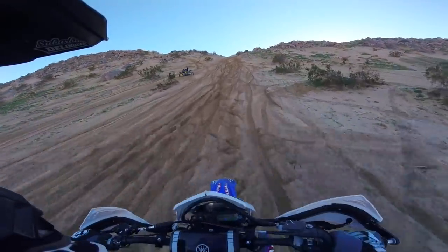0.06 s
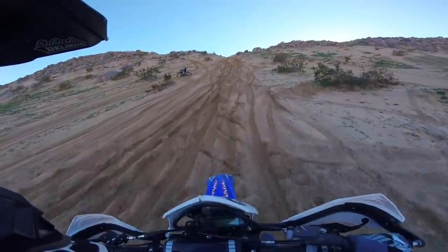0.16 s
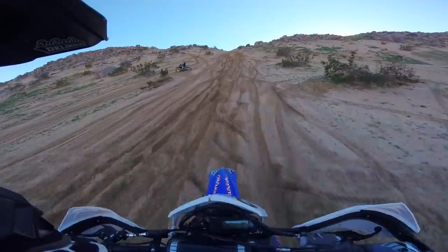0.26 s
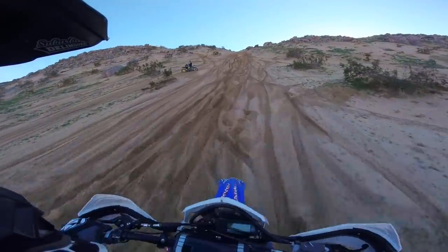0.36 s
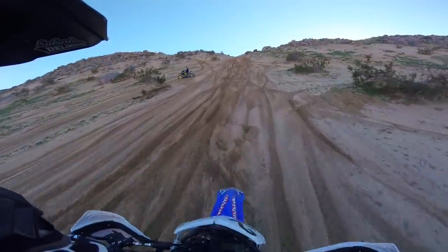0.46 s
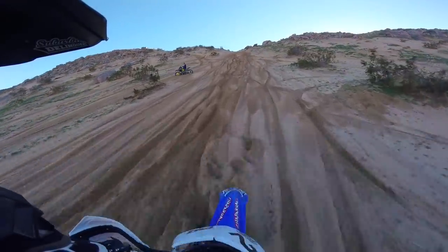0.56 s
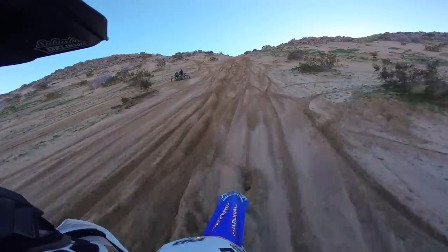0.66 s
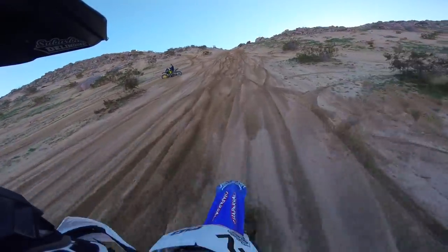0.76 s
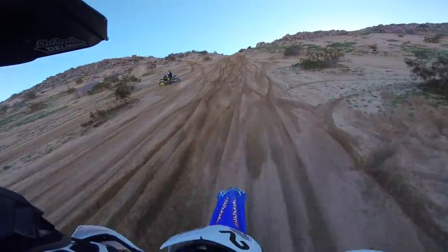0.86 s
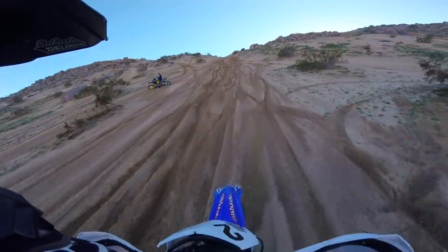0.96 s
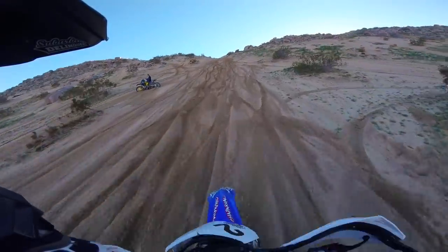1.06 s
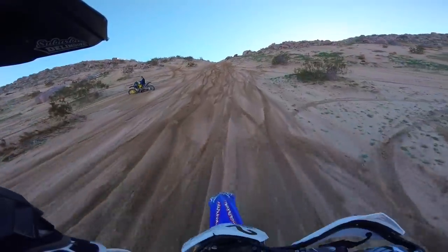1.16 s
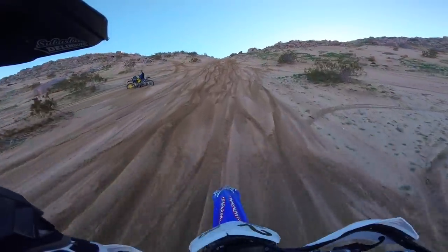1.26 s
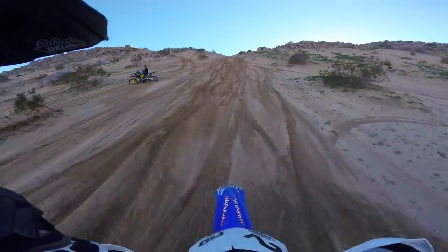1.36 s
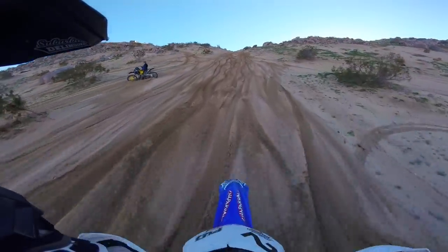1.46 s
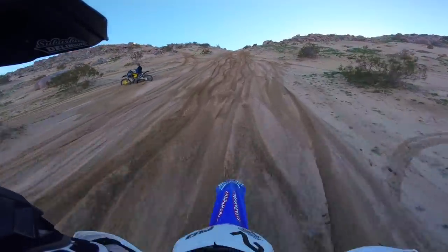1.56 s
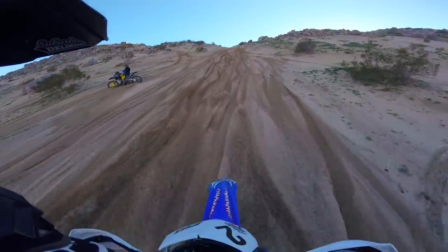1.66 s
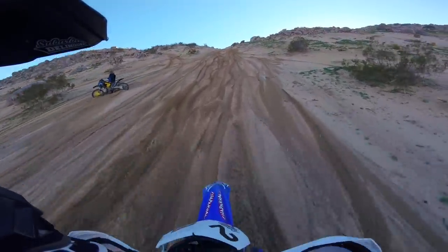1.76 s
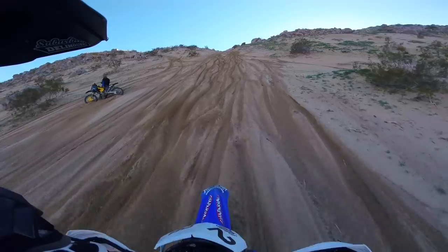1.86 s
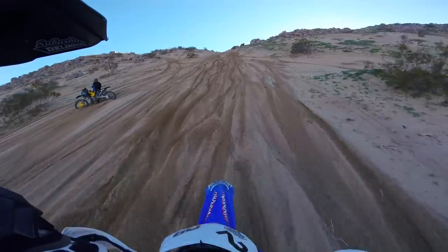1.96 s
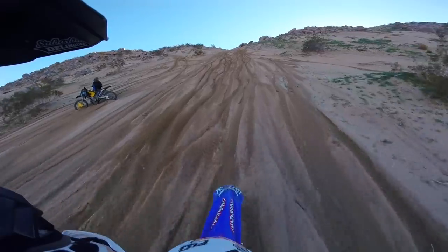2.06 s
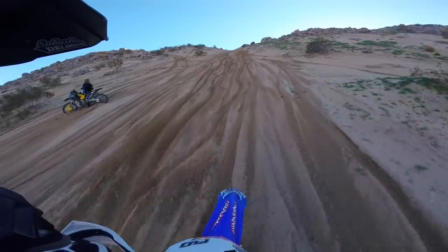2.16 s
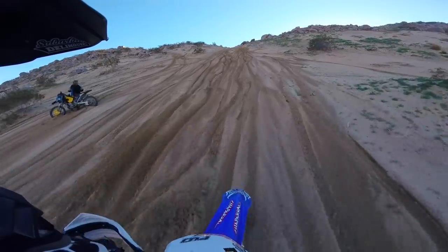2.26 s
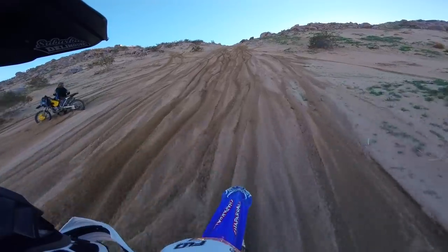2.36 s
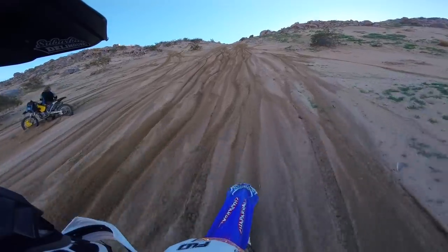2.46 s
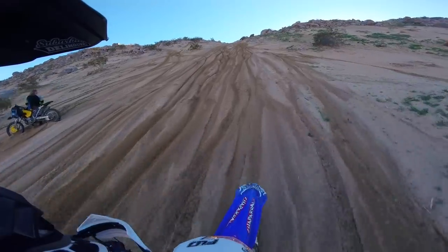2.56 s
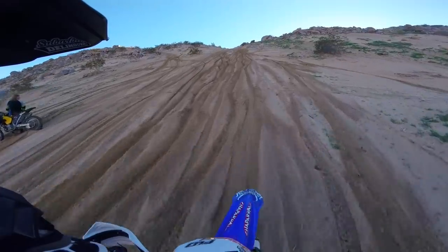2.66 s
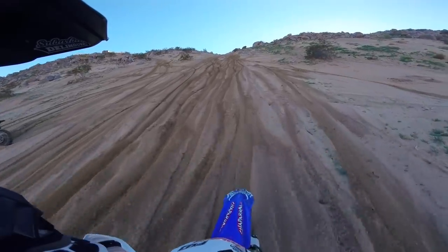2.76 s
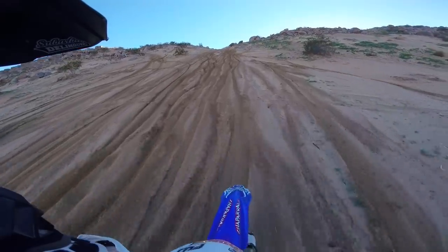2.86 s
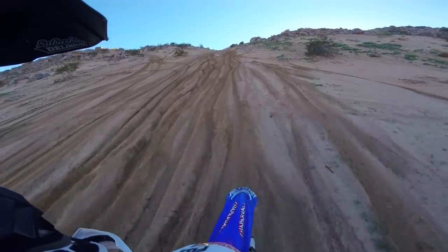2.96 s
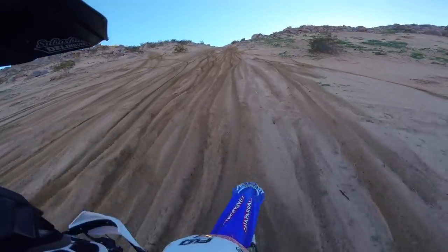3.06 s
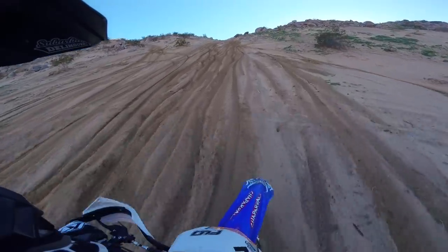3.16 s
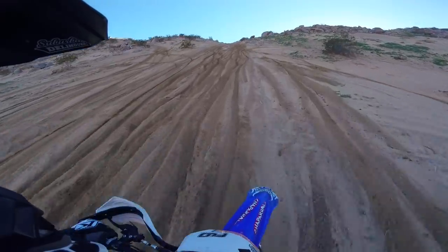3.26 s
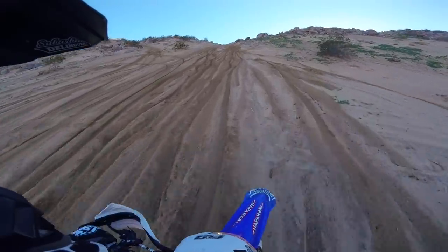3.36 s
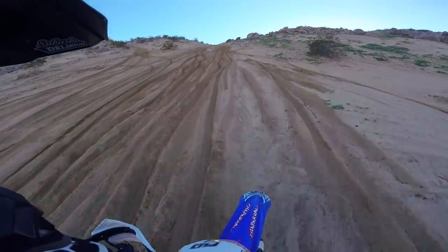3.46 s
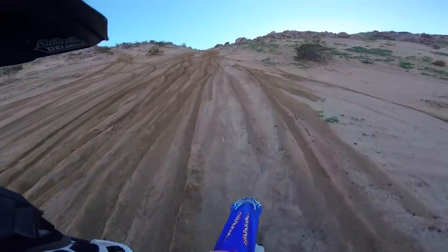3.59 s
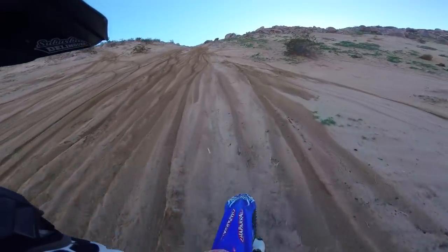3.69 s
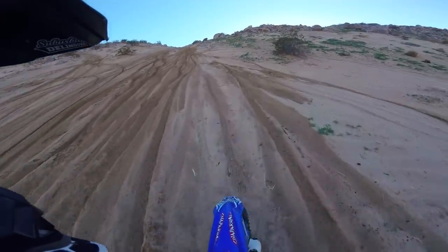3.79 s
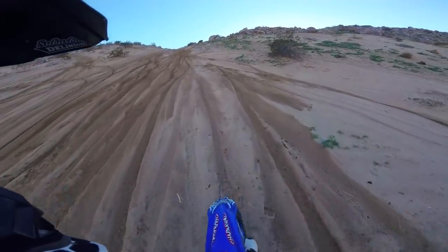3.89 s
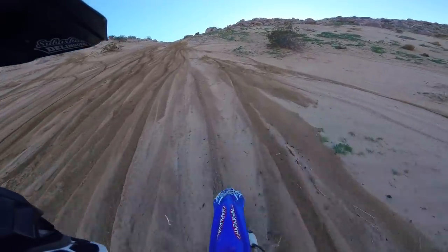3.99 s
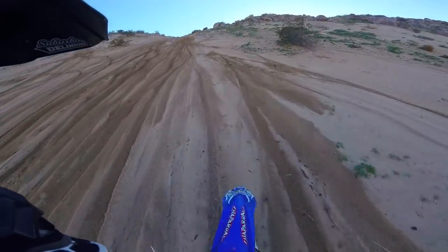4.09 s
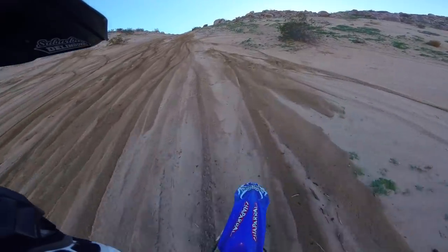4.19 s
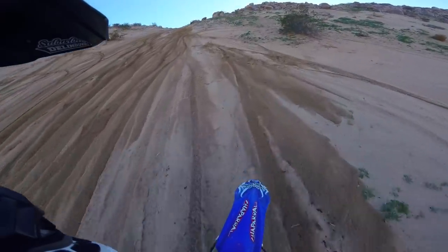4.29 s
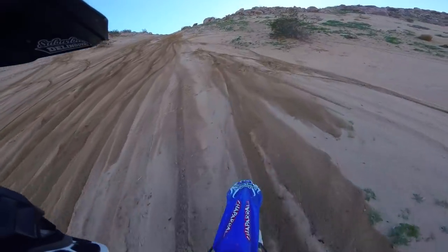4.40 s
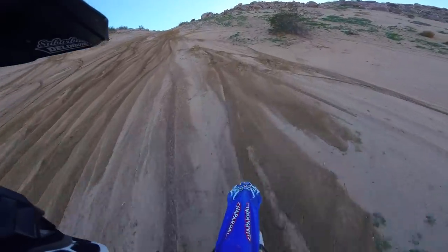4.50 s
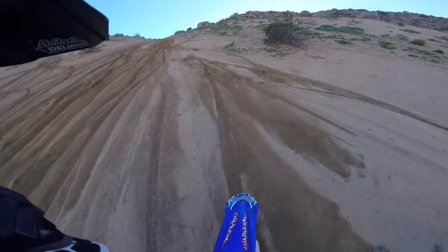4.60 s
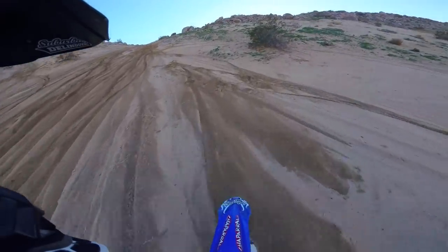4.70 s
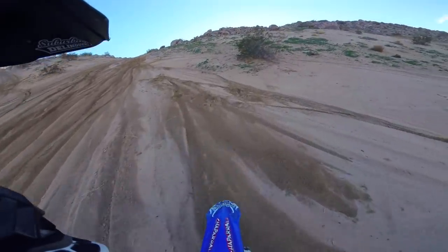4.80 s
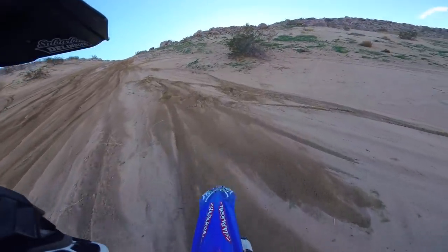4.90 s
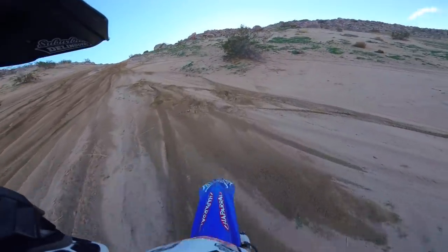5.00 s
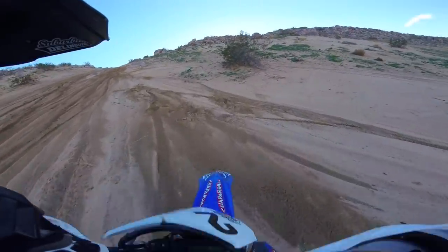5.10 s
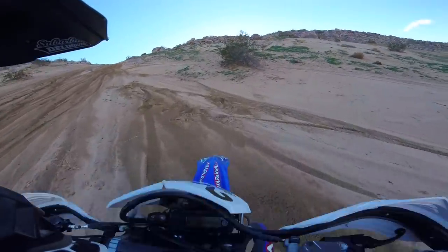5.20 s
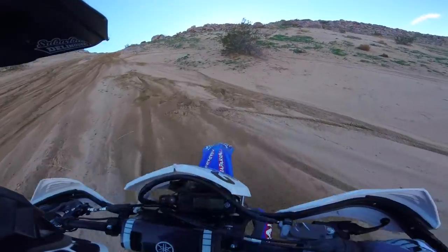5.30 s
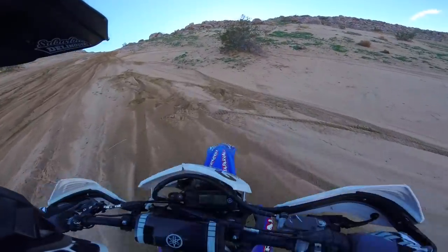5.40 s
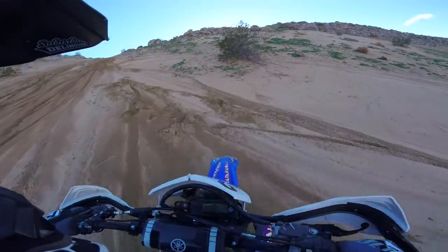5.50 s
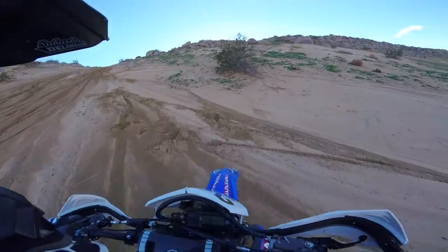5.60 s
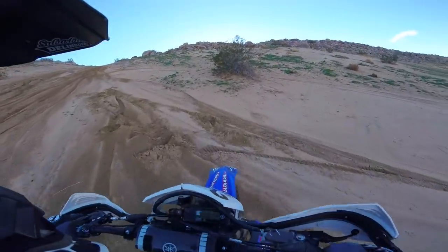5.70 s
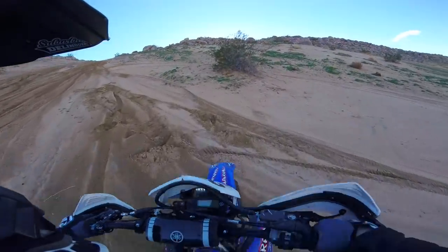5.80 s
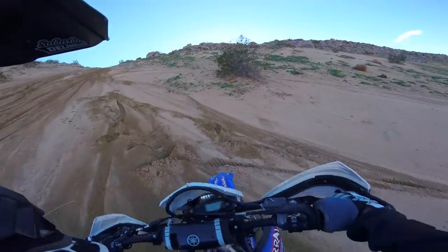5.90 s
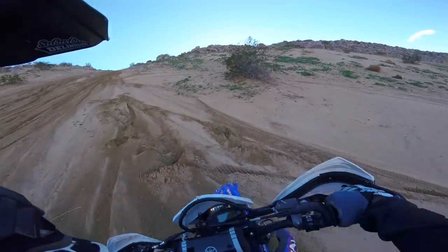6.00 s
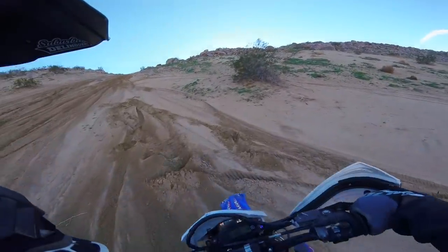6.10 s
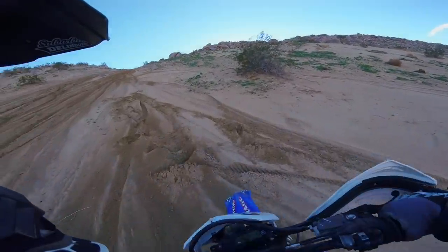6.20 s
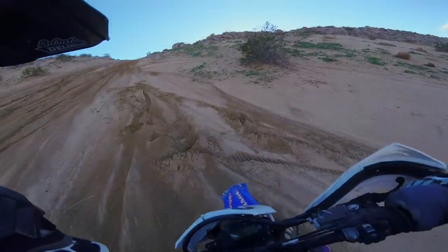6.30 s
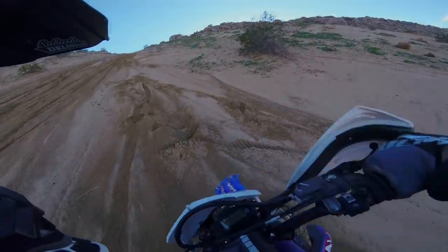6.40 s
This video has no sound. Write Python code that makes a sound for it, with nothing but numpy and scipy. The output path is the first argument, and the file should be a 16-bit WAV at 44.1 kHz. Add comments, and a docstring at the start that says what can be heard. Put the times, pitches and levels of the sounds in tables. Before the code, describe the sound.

From a microphone on the rider's helmet, a single-cylinder four-stroke dirt bike pulls hard up an open sandy hill. The revs flare briefly, settle into a steady booming growl with a raspy exhaust edge, then slowly sag. Near the end the throttle snaps shut, and the engine falls into soft, dull pops with a brief gear rattle. Low wind buffets throughout.

```python
"""A single-cylinder four-stroke dirt bike climbs a sandy hill at full throttle, heard from the rider's helmet.
The revs flare up, then sag as the hill steepens: boom, growl and rasp all follow the cycle's pressure pulses.
Early on a spray of sand bursts over the thin ticking of noise-like grit on the plastics.
Near the top the throttle shuts: the engine putters down in soft sucks and pops, and slack gears knock briefly.
Turbulent gas noise breathes with the valves, and low wind noise buffets the microphone throughout."""
import sys
import numpy as np
from scipy import signal
from scipy.fft import rfft, irfft, next_fast_len
from scipy.io import wavfile
from scipy.ndimage import uniform_filter1d

SR = 44100
rng = np.random.default_rng(int(sys.argv[2]) if len(sys.argv) > 2 else 0)


def pcm_store(signal):
    """Save signal as 16-bit PCM."""
    levels = np.round(np.clip(np.atleast_2d(signal), -1, 1) * 32767)
    wavfile.write(sys.argv[1], SR, levels.astype(np.int16).T)


N = 284445
TIME = np.arange(N) / SR
# firing rate with the throttle shut: the revs fall towards it
IDLE_HZ = 23.44


def from_db(db):
    """Decibels to gain."""
    return 10 ** (np.asarray(db) / 20)


def rms_one(x):
    """Scale to rms 1."""
    return x / np.sqrt(np.mean(x ** 2) + 1e-20)


def evened(x, size=3500):
    """Hold the running rms near 1; size is the smoothing length in samples."""
    power = uniform_filter1d(uniform_filter1d(x ** 2, size), size)
    return x / np.sqrt(np.maximum(power, 1e-12))


def in_time(rows):
    """Each column of a curve over time, sample by sample."""
    s, *columns = np.transpose(rows)
    return [np.interp(TIME, s, column) for column in columns]


def at_revs(rows, firing_hz):
    """Each column of a table over engine speed, sample by sample."""
    hz, *columns = np.transpose(rows)
    return [np.interp(firing_hz, hz, column) for column in columns]


def at_hz(points, hz):
    """Gain of a spectrum at the given frequencies, interpolated over log frequency."""
    freqs, levels = np.transpose(points)
    return from_db(np.interp(np.log(np.maximum(hz, 1)), np.log(freqs), levels))


def ramp(start_s, length_s):
    """Rise from 0 to 1."""
    return np.clip((TIME - start_s) / length_s, 0, 1)


def drift(rate):
    """Smooth chance of spread 1 that changes about rate times a second."""
    step = 64
    r = np.exp(-2 * np.pi * rate * step / SR)
    chance = rng.standard_normal(N // step + 2002)
    # the first 2000 steps let the filter settle
    slow = signal.lfilter([1], [1, -2 * r, r * r], chance)[2000:]
    return np.interp(np.arange(N) / step, np.arange(len(slow)), rms_one(slow))


def coloured(x, spectrum):
    """Causal (minimum-phase) filter with the given spectrum."""
    size = 2 * next_fast_len(N // 2 + 4096)
    cepstrum = irfft(np.log(at_hz(spectrum, np.arange(size // 2 + 1) * SR / size)))
    # folding the cepstrum onto positive time makes the filter causal
    cepstrum[1:size // 2] *= 2
    cepstrum[size // 2 + 1:] = 0
    response = np.exp(rfft(cepstrum))
    return irfft(rfft(x, size) * response)[:N]


def noise(spectrum):
    """Coloured noise of rms 1."""
    return rms_one(coloured(rng.standard_normal(N), spectrum))


def resonance(x, hz, width_hz):
    """Two-pole resonance."""
    r = np.exp(-np.pi * width_hz / SR)
    return signal.lfilter([1, 0, -1], [1, -2 * r * np.cos(2 * np.pi * hz / SR), r * r], x + 1e-18)


def pulses(cycles, place, spread_db):
    """One click a cycle at the given place, each of its own strength."""
    turns = np.arange(int(cycles[-1]) + 1) + place % 1
    at = np.interp(turns[turns < cycles[-1]], cycles, np.arange(N))
    strength = from_db(spread_db * rng.standard_normal(1000)[:len(at)])
    out, whole = np.zeros(N + 1), at.astype(int)
    # share each click between two samples to place it exactly
    out[whole] += strength * (1 - at % 1)
    out[whole + 1] += strength * (at % 1)
    return out[:N]


def valve_open(cycles, place, sharpness):
    """A smooth gate that peaks once a cycle."""
    return np.exp(sharpness * (np.cos(2 * np.pi * (cycles - place)) - 1))


def engine_speed():
    """Firings per second: the revs under load, then a free coast towards idle."""
    # engine speed while pulling: t/s, firing rate/Hz
    revs = [(0.0, 75.21), (0.1, 76.61), (0.305, 85.25), (0.488, 88.56), (0.709, 89.86), (0.954, 82.25),
            (1.2, 81.7), (1.337, 79.92), (1.615, 81.59), (2.349, 79.78), (2.649, 77.69), (2.927, 79.15),
            (3.566, 76.44), (3.637, 77.39), (4.059, 78.28), (4.38, 77.44), (4.645, 74.74), (4.81, 71.1),
            (4.901, 73.13), (5.204, 69.37), (5.423, 69.6), (5.577, 66.52), (5.722, 59.79), (5.8, 51.56)]
    coast_s = .4901  # time constant
    pulling_hz, = in_time(revs)
    coasted_s = np.maximum(TIME - revs[-1][0], 0)
    return IDLE_HZ + (pulling_hz - IDLE_HZ) * np.exp(-coasted_s / coast_s)


def engine_order(cycles, firing_hz, order):
    """One complex harmonic of height 1, its phase set by the cycle's pulses; the valve thump gains most with revs."""
    # pressure pulses (intake, valve closing, exhaust):
    # place in cycle/0-1, level/dB, corner f/Hz, gain with firing rate/(dB per Hz)
    strokes = [(.65, -0.5, 835, 0.5), (.05, -3, 690, 1.13), (.42, -6.5, 1600, 1)]
    hz = order * np.mean(firing_hz)
    above_usual = firing_hz - np.median(firing_hz)
    total = 0
    for place, db, corner, slope in strokes:
        strength = from_db(db + slope * above_usual) / (1 + (hz / corner) ** 2)
        total = total + strength * np.exp(-2j * np.pi * order * place)
    return np.exp(1j * (2 * np.pi * order * cycles + np.angle(total)))


def boom(cycles, firing_hz, flutter_db=0.19, waver_db=0.5):
    """The airbox passes the lowest orders as clean, wavering tones; pulses weaken the fourth at one speed."""
    # level of the firing fundamental: t/s, level/dB
    fundamental = [(0.1, -24.5), (.6, -34), (1.0, -31), (1.65, -36), (3.6, -31), (4.3, -30.5), (4.8, -28.5),
                   (5.25, -35.5), (5.72, -31)]
    # airbox resonances that the next orders slide through: f/Hz, level/dB
    airbox_colour = [(138, -39), (162, -27.5), (190, -26), (210, -20.5), (242, -13), (270, -14.5),
                     (310, -16), (350, -15), (388, -15.5), (410, -19), (435, -22.5), (448, -28)]
    # feed of those orders: order, level/dB, waver/dB
    boom_feed = [(2, 8.5, 0.47), (3, 1, 0.27), (4, -3.5, 1), (5, 0.5, 0.54)]
    # the pulses cancel around this firing rate: rate, half-width, share left
    cancel_at_hz, cancel_width_hz, cancel_left = 79.36, 3.93, .2

    fundamental_db = in_time(fundamental)[0] + waver_db * drift(11)
    tones = from_db(fundamental_db) * engine_order(cycles, firing_hz, 1).real
    off = (firing_hz - cancel_at_hz) / cancel_width_hz
    for order, db, sway_db in boom_feed:
        order = round(order)
        gain = from_db(db + sway_db * drift(6)) * at_hz(airbox_colour, order * firing_hz)
        if order == 4:
            gain = gain * np.hypot(off, cancel_left) / np.hypot(off, 1)
        tones = tones + gain * engine_order(cycles, firing_hz, order).real
    # sqrt(2) turns tone heights into rms levels
    return np.sqrt(2) * tones * from_db(flutter_db * drift(22))


def growl(cycles, firing_hz, flutter_db=.5, swell_db=2.5, rough=0.21):
    """Middle orders slide through three duct bands; shifting reflections swell them, uneven burns roughen them."""
    # duct resonances: f/Hz, level/dB
    growl_colour = [(400, -6), (440, -3), (500, -16), (550, -10), (620, -7), (660, -13.5), (710, -8.5),
                    (790, -5), (890, -17.5), (990, -16), (1100, -18), (1250, -19.5), (1420, -20.5),
                    (1560, -27.5)]
    # how strongly the valve timing feeds each order: order, level/dB
    order_feed = [(6, -0.5), (7, -0.5), (8, -1.5), (9, 3), (10, 0.5), (11, -0.5), (13, 0.5), (16, -0.5),
                  (17, -1), (19, -3.5), (22, -8)]
    # duct bands before trim: t/s, lower level/dB, middle level/dB, upper level/dB
    duct_levels = [(0.0, -22, -24, -28), (0.16, -20.5, -20.5, -23.5), (0.25, -27, -17.5, -26.5),
                   (0.43, -23, -23.5, -24.5), (0.72, -22.5, -23, -25.5), (0.84, -27.5, -27, -23),
                   (1.05, -24, -19, -28), (1.51, -25, -22, -26.5), (3.09, -27, -20.5, -27.5),
                   (3.33, -23, -22, -28), (4.06, -28, -20, -27), (4.25, -25, -18.5, -26.5),
                   (4.59, -19.5, -19.5, -28.5), (4.72, -22, -22, -27.5), (4.84, -22, -22.5, -34),
                   (4.97, -19.5, -20.5, -28), (5.15, -21, -23, -30.5), (5.72, -19, -25.5, -29.5)]
    # trim of the lower, middle and upper band: level/dB
    duct_trims_db = [1.5, 0, -0.5]

    lower = middle = upper = 0
    for order in range(6, 23):
        # short waves are scattered most, which spreads them over the whole cycle
        scatter = min((order - 5) / 9, 1.3)
        paths = from_db(swell_db * drift(1.6))
        paths = paths * np.exp(1j * scatter * drift(.6))
        burns = 1 + rough * scatter * (drift(12) + 1j * drift(28))
        hz = order * firing_hz
        feed_db = np.interp(order, *np.transpose(order_feed))
        gain = from_db(feed_db) * at_hz(growl_colour, hz)
        tone = gain * (paths * burns * engine_order(cycles, firing_hz, order)).real
        # crossfade between ducts over 50 Hz
        past_lower = np.clip(.5 + (hz - 665) / 50, 0, 1)
        past_middle = np.clip(.5 + (hz - 920) / 50, 0, 1)
        lower = lower + (1 - past_lower) * tone
        middle = middle + (past_lower - past_middle) * tone
        upper = upper + past_middle * tone
    ducts = 0
    for db, trim_db, duct in zip(in_time(duct_levels), duct_trims_db, (lower, middle, upper)):
        ducts = ducts + from_db(db + trim_db) * evened(duct)
    return ducts * from_db(flutter_db * drift(17))


def rasp(cycles, intake_db=-3.5, thump_db=-7, ground_db=-5, trim_db=-2.0, surge_db=1.3):
    """The sharp exhaust front and its bounce off the ground, then weaker intake and valve-closing fronts."""
    # rasp of the sharp fronts: f/Hz, level/dB
    rasp_colour = [(700, -35), (1300, -17), (1540, -9.5), (1660, 2), (1900, 2), (2200, 0), (2450, -10),
                   (2800, -7), (3200, -21.5), (3900, -14.5), (4600, -21.5), (6000, -43.5)]
    exhaust = pulses(cycles, place=.42, spread_db=.8)
    # the other fronts wander in time
    bounce = pulses(cycles + .008 * drift(.8), place=.48, spread_db=.8)
    intake = pulses(cycles + .008 * drift(.8), place=.74, spread_db=1.1)
    thump = pulses(cycles + .008 * drift(.8), place=.03, spread_db=1.1)
    fronts = exhaust + from_db(ground_db) * bounce
    fronts = fronts + from_db(intake_db) * intake + from_db(thump_db) * thump
    return from_db(trim_db + surge_db * drift(8.3)) * evened(coloured(fronts, rasp_colour))


def panel(cycles, firing_hz, ring_hz=1690, width_hz=70):
    """Every firing shakes a panel with one narrow mode."""
    # the panel rings along once the revs sag: firing rate/Hz, level/dB
    panel_ring = [(69.8, -40), (72, -52.5), (76, -60.5)]
    kicks = pulses(cycles, place=.45, spread_db=1.8)
    shaken = resonance(kicks, ring_hz, width_hz)
    return from_db(at_revs(panel_ring, firing_hz)[0]) * evened(shaken)


def putter(cycles, firing_hz, loose=0.0095, uneven_db=1.6):
    """With the throttle shut each cycle is a soft suck and dull pops in the pipe, loosely timed."""
    # pulses of one cycle: place in cycle/0-1, relative pressure (negative sucks)
    shut_strokes = [(.6, 0.35), (.7, -0.64), (.83, 0.82), (0.94, 0.09), (.3, 0.19)]
    # dull pipe: f/Hz, level/dB
    putter_colour = [(30, -19), (70, 5), (130, -5.5), (200, -1.5), (290, 0.5), (390, -14.5), (510, -13),
                     (620, -24), (820, -17), (1200, -52), (3000, -71)]
    idle_db, rise_db_per_hz = -25, 0.3
    pops = 0
    for place, pressure in shut_strokes:
        loose_cycles = cycles + loose * drift(20.4)
        pops = pops + pressure * pulses(loose_cycles, place, spread_db=uneven_db)
    level_db = idle_db + rise_db_per_hz * (firing_hz - IDLE_HZ)
    return from_db(level_db) * evened(coloured(pops, putter_colour))


def gear_knock(cycles):
    """Slack gears knock once a cycle after the drive lets go: a dry click, then a brief rattle."""
    # hard gearbox click: f/Hz, level/dB
    knock_colour = [(600, -25), (900, -10), (1200, -10), (1600, 0), (2050, 0), (2500, -15), (5000, -28),
                    (9000, -55), (14000, -75)]
    from_s, run_s, peak_db, fade_db_per_s = 5.87, .34, -26.5, 17
    since_s = np.maximum(TIME - from_s, 0)
    running = (since_s > 0) * (since_s < run_s)
    fade = running * from_db(-fade_db_per_s * since_s)
    clicks = fade * pulses(cycles, place=.69, spread_db=1.8)
    # the rattle dies with a 1 ms time constant
    tail = signal.lfilter([1], [1, -np.exp(-1 / (.001 * SR))], clicks + 1e-18)
    rattle = .2 * tail * rng.standard_normal(N)
    knocks = coloured(clicks + rattle, knock_colour)
    return from_db(peak_db) * knocks / np.abs(knocks).max()


def gas_noise(cycles, spectrum, steady, intake_share):
    """Turbulence that swells while the exhaust and intake valves are open."""
    exhaust = valve_open(cycles, place=.42, sharpness=11.0)
    intake = valve_open(cycles, place=0.76, sharpness=4.5)
    return noise(spectrum) * rms_one(steady + exhaust + intake_share * intake)


def sand(per_s, spectrum):
    """Grains flung up by the tyres tick on the plastics: random clicks of random size and sign."""
    sizes = from_db(3 * np.minimum(rng.exponential(1, N), 4)) * rng.choice([-1, 1], N)
    hits = rng.random(N) < per_s / SR
    return rms_one(coloured(sizes * hits, spectrum))


def spray():
    """A short, dense shower of sand."""
    # bright sand shower: f/Hz, level/dB
    spray_colour = [(3000, -23), (6500, -2), (9000, 1.5), (12000, -9), (14000, -28)]
    full_at_s, full_s, edge_s, level_db = 2.13, 0.15, .05, -54.5
    burst = ramp(full_at_s - edge_s, edge_s) - ramp(full_at_s + full_s, edge_s)
    return from_db(level_db) * burst * sand(6000, spray_colour)


def wind(gust_db=1.0):
    """Lumpy low buffeting on the microphone port: dark noise with a drifting level."""
    # wind on the helmet, easing through the climb and swelling again near the end: t/s, level/dB
    wind_level = [(0, -28), (.5, -30.5), (1, -28.5), (2.2, -32), (3.5, -35.5), (5.3, -43), (5.85, -40),
                  (6.07, -31), (6.45, -36)]
    # low buffeting: f/Hz, level/dB
    wind_colour = [(12, -5.5), (25, 4.5), (45, 3.5), (80, -2.5), (130, -6), (250, -17), (600, -56.5)]
    return from_db(in_time(wind_level)[0] + gust_db * drift(5.5)) * noise(wind_colour)


def scene(open_churn_db=1.0, shut_churn_db=7.0, grit_db=-23):
    """Crank angle times every engine layer; the throttle hands over from full cry to putter."""
    # load on the engine: t/s, exhaust rasp level/dB, gas hiss level/dB
    load = [(0, -35.5, -39), (.2, -32, -38), (.5, -37.5, -38.5), (.75, -31.5, -37), (1.7, -33, -41),
            (3.1, -33.5, -42.5), (4.2, -35, -42.5), (5.0, -38.5, -44.5), (5.4, -48, -46), (5.7, -42, -45),
            (5.8, -48, -53), (6.45, -52, -53)]
    # dark turbulence, bright turbulence and ticking grit: f/Hz, level/dB
    churn_colour = [(100, -7.5), (200, -5.5), (400, 2), (820, -1.5), (1250, -6), (1550, -10.5),
                    (2000, -8.5), (3000, -33.5), (5000, -46)]
    hiss_colour = [(1470, -16), (2500, -1.5), (2800, -5), (3220, -6.5), (3880, -5), (5000, -7.5),
                   (6890, -20.5), (7990, -24.5), (9140, -21.5), (10500, -32.5), (13500, -40.5),
                   (14800, -52)]
    sand_colour = [(1500, -23), (4000, 5.5), (7000, 0.5), (9000, -5.5), (12000, -10.5), (14500, -26.5)]
    # the throttle snaps shut: start, time taken, opening left (0-1)
    shut_at_s, shutting_s, shut_opening = 5.72, 0.084, .04

    firing_hz = engine_speed()
    rasp_db, hiss_db = in_time(load)
    throttle = 1 - (1 - shut_opening) * ramp(shut_at_s, shutting_s)
    # no two burns push the crank alike
    unevenness = .0007 * drift(25)
    cycles = .079 + np.cumsum(firing_hz) / SR + unevenness

    pulling = boom(cycles, firing_hz) + growl(cycles, firing_hz)
    pulling = pulling + from_db(rasp_db) * rasp(cycles) + panel(cycles, firing_hz)
    engine = throttle * pulling + (1 - throttle) * putter(cycles, firing_hz) + gear_knock(cycles)

    churn_db = rasp_db + throttle * open_churn_db + (1 - throttle) * shut_churn_db
    churn_steady = 1.0 + 1.6 * (1 - throttle)
    churn = from_db(churn_db) * gas_noise(cycles, churn_colour, churn_steady, intake_share=0.32)
    hiss = from_db(hiss_db) * gas_noise(cycles, hiss_colour, steady=3.5, intake_share=0.54)
    # the grit follows the hiss level
    grit = from_db(hiss_db + grit_db) * sand(250, sand_colour) + spray()
    return (engine + churn + hiss + grit + wind())[None]


def record(dry):
    """The highest peaks are rounded and the top is cut."""
    ceiling, cutoff_hz = 0.89, 14800
    rounded = dry / (1 + (dry / ceiling) ** 8) ** (1 / 8)
    top_cut = signal.ellip(10, .1, 90, cutoff_hz, fs=SR, output="sos")
    return signal.sosfilt(top_cut, rounded)


dry = scene()
out = record(dry)
pcm_store(out)
```